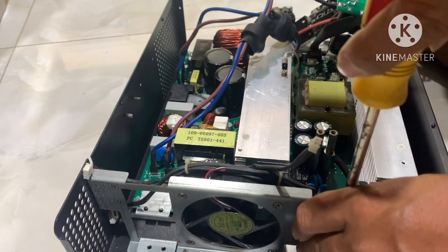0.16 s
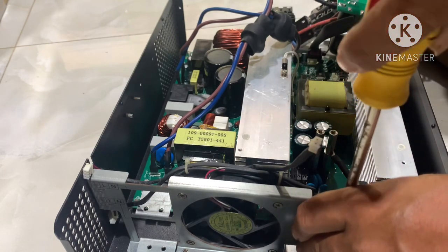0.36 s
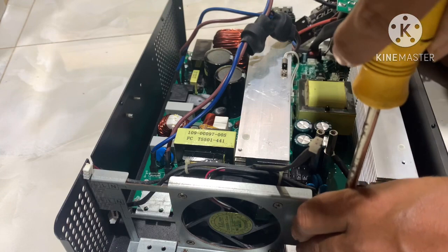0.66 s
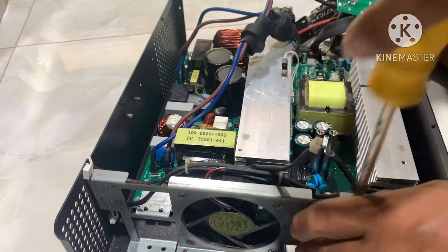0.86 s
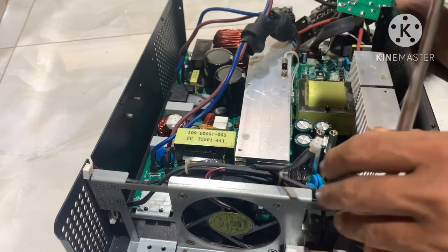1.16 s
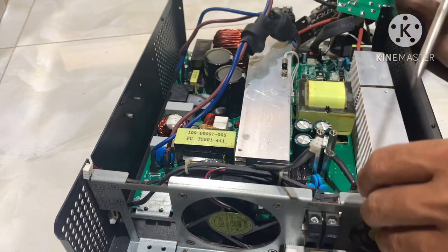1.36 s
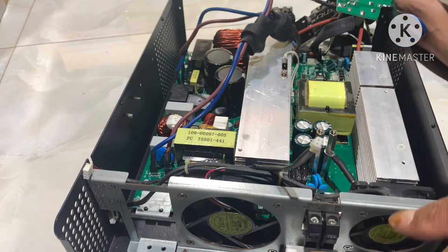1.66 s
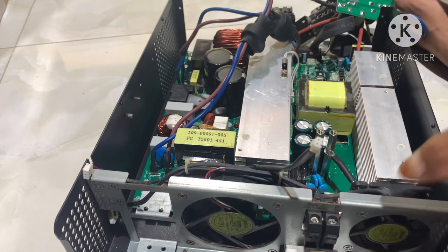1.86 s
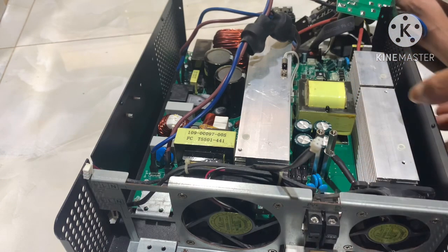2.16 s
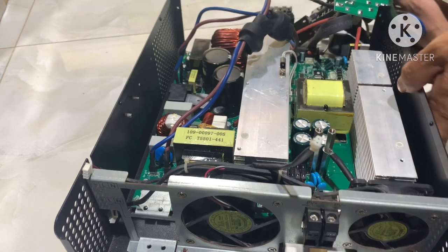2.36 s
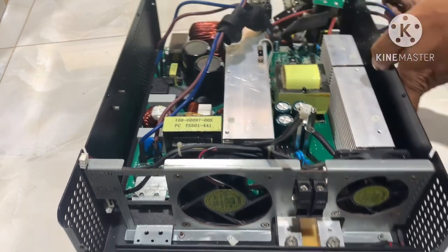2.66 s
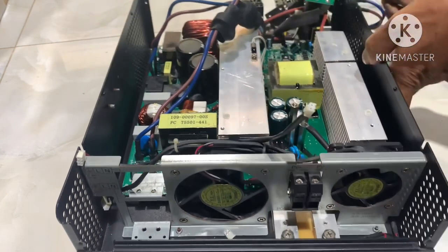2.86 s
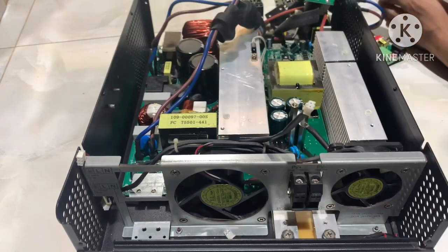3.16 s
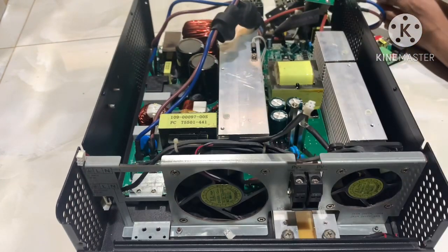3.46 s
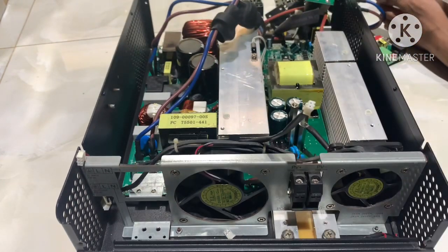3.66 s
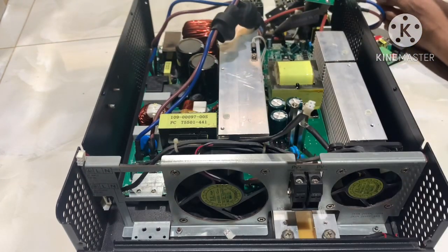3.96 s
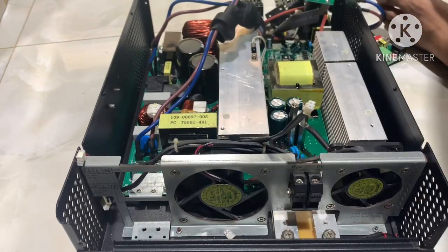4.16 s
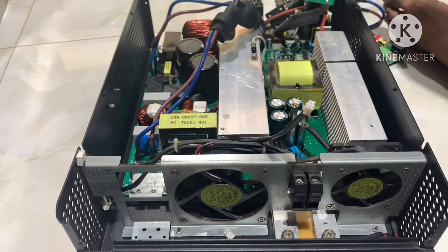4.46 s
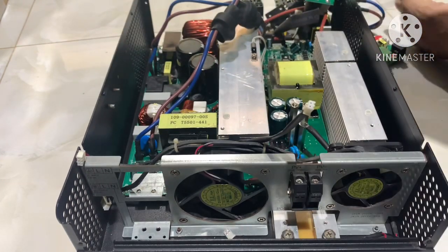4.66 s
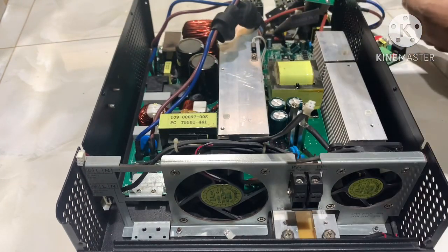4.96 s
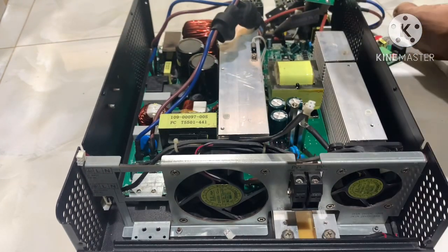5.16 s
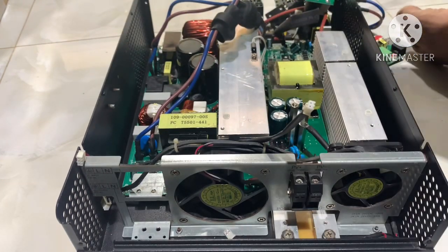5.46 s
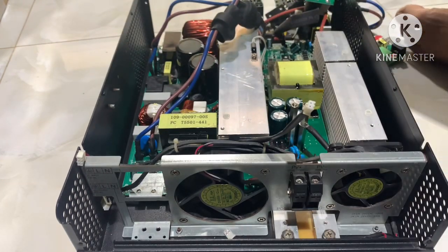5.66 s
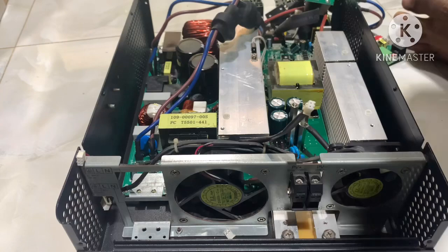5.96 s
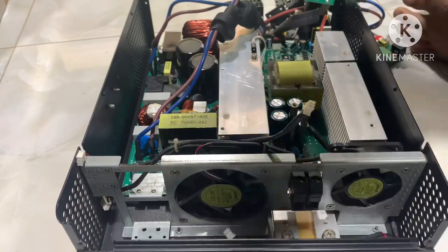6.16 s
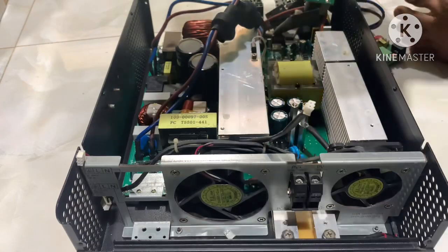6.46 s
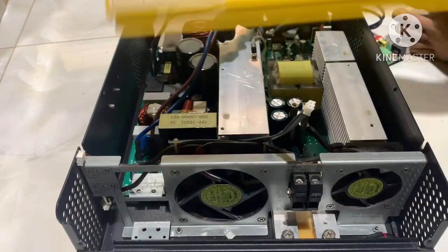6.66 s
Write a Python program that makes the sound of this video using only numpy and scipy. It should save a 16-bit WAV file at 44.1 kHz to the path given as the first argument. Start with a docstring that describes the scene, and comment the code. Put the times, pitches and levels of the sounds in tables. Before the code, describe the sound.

A low electrical hum and a chugging single-cylinder engine passing outside, with faint metal rubbing, screwdriver clinks and sharp knocks on a sheet-metal case.

```python
"""On a workshop floor an open inverter hums from the start, a 100 Hz tone; its late dips stand for beating.
A screwdriver shaft clinks softly, then hands rub and drag the sheet-metal case: filtered grainy noise.
Outside, a single-cylinder engine swells and thuds past, resonances struck by each firing, with whine and road hiss.
Wires and tools tick on the metal as it passes; knocks ring the case panels, thumps follow on the floor.
Late on the case is dragged again, and the loose cover rattles once more, all in front of a two-port microphone."""
import sys
import numpy as np
from scipy import signal
from scipy.fft import rfft, irfft, next_fast_len
from scipy.io import wavfile
from scipy.ndimage import uniform_filter1d

SR = 44100
rng = np.random.default_rng(int(sys.argv[2]) if len(sys.argv) > 2 else 0)


def master_out(mix):
    """Clip the mix to full scale and print it as 16-bit PCM to the path in sys.argv[1]."""
    frames = np.transpose(np.atleast_2d(mix))
    ceiling = np.clip(frames, -1, 1)
    pcm = np.round(ceiling * 32767).astype(np.int16)
    wavfile.write(sys.argv[1], SR, pcm)


N = 301057
TIME = np.arange(N) / SR

# Knocks on the sheet metal. Each row: start in seconds, clack level in dB before colouring, panel ring level in dB,
# share of the ring time left by the grip (0-1), pitch factor.
KNOCKS = [(3.846, -56, -58, 0.4, 0.98), (3.974, -51, -56, 0.1, 1), (3.98, -52.5, -36, 0.4, 0.96),
          (4.9815, -54, -58, .9, 1.03), (4.986, -44, -46, 0.9, 1.03), (4.996, -48, -42.5, 1, 0.99),
          (5.018, -46, -40.5, 0.96, 1.02), (5.0325, -44, -40, 0.84, 1.12), (5.048, -47.5, -49, 0.9, 1.03),
          (5.066, -53, -45.5, 0.8, 1.03), (5.095, -57, -48, 1, 1.02), (5.1425, -38.5, -38.5, 1, 1),
          (5.1468, -55, -38, 0.74, 1), (6.021, -72, -51.5, 0.37, 1.17), (6.4195, -50, -61, .5, 1),
          (6.427, -49, -61, 0.25, 1.04)]
# Modes of the case panels, ungripped. Each row: frequency in Hz, level in dB, t60 in seconds.
PANEL_MODES = [(174, -6, 0.14), (311, -11, 0.27), (380, -15.5, 0.32), (453.3, -1.5, 0.19), (492, 0, 0.13),
               (568, -15, 0.12), (660, -23, 0.2), (707, -21, 0.11), (783, -17.5, 0.14), (906, -17, 0.07),
               (972, -27, 0.17), (1312, -25, 0.16), (1490, -27, 0.17), (1518, -29, 0.13), (1630, -30, 0.11),
               (3470, -28, 0.21)]
# Spectrum of the clack. Each row: frequency in Hz, gain in dB.
CLACK_COLOUR = [(200, 5), (350, 12), (620, 2), (900, 8.5), (1150, -11), (1500, 6), (2300, -10.5),
                (2750, -10), (3350, 9), (4200, -9), (4700, 1.5), (5500, 0.5), (6500, 7.5), (7400, 5),
                (8400, -7), (9500, -10), (10800, -40), (15000, -45)]
# Small bright contacts. Each row: start in seconds, level in dB before colouring, sharpness (0-1).
TICKS = [(1.684, -54, 0.1), (3.8448, -31, 0.45), (3.8487, -31.5, 0.36), (3.864, -43, .1), (3.973, -37, .2),
         (3.9757, -36, 0.1), (3.981, -38, 0.1), (3.986, -39, .2), (4.012, -45, 0), (4.0278, -24, 0),
         (4.1353, -43.5, 0.3), (4.247, -41, 0.35), (4.343, -46.5, 0.3), (4.3775, -40, 0.3),
         (4.491, -39.5, .1), (4.9085, -50, 0.2), (4.9853, -34.5, 0), (4.994, -39, 0), (5.0213, -35, 0.14),
         (5.0363, -28.5, 0), (5.049, -39, 0), (5.065, -45, 0), (5.077, -41, 0), (5.1432, -26, 0.03),
         (6.4216, -43.5, 1), (6.4237, -36, 0.8), (6.428, -41, .3), (6.43, -40.5, .2)]
# Spectra of a tick and of its glassy top. Each row: frequency in Hz, gain in dB.
TICK_COLOUR = [(500, -39), (2600, -28), (3600, -11), (4600, -19.5), (6300, -3.5), (7500, -3), (8400, 2),
               (9400, -4.5), (10500, -32), (12500, -48), (15000, -59)]
SHARP_COLOUR = [(8000, -38), (9700, -5), (10500, -14), (11500, -4), (12600, -21), (14500, -25)]
# Thin high modes of screws and terminals. Each row: frequency in Hz, relative level in dB, t60 in seconds.
TERMINAL_MODES = [(3620, -7.5, 0.039), (5660, -18, 0.12), (6240, -14, 0.12), (6298, -10.5, 0.18),
                  (6570, -16, .14), (6860, -12.5, 0.08), (8200, -6.5, 0.07), (8330, -7.5, 0.039),
                  (8660, -13.5, 0.089), (9140, -10.5, 0.077), (9540, -14.5, 0.065)]
# The loose cover rattles. Each row: start in seconds, level in dB before the ring.
COVER_RATTLES = [(3.976, -55.5), (4.985, -57), (5.145, -51), (6.425, -51.5)]
# Modes of the cover. Each row: frequency in Hz, level in dB, t60 in seconds.
COVER_MODES = [(706, -4.5, 0.037), (952, -1, 0.063), (1026, 0, 0.066), (1230, 1, 0.074), (1325, 5, 0.049),
               (1424, 6.5, 0.045), (1640, -1.5, 0.063), (1995, -5.5, 0.074), (2380, -2.5, 0.035)]
# The screwdriver shaft clinks, one row: start in seconds, level in dB before the ring.
SHAFT_CLINK = (.882, -57.5)
# Modes of the shaft. Each row: frequency in Hz, level in dB, t60 in seconds.
SHAFT_MODES = [(1290, -1, 0.11), (1630, -14, .07), (2070, 2, 0.12)]
# Dull thumps of the case on the floor. Each row: start in seconds, level in dB before the decay, ring in Hz.
FLOOR_BUMPS = [(5.043, -31, 194.6), (5.052, -39, 265.7), (5.151, -41.5, 313), (5.161, -31, 98)]
# The case judders as it slides. Each row: peak in seconds, length in seconds, level in dB, ring in Hz,
# pitch wander in Hz.
JUDDERS = [(2.61, 0.018, -67, 1354, 37), (2.668, 0.055, -64, 854, 30), (2.672, 0.041, -68, 639, 30),
           (2.683, 0.023, -63, 460, 15), (2.981, 0.037, -63.5, 718, 8.7), (2.982, 0.045, -74.5, 1676, 13),
           (6.008, 0.1, -65, 556, 41), (6.016, 0.062, -63, 692, 37), (6.12, 0.053, -65, 730, 16.2)]
# Hands rubbing on metal and wires. Each row: peak in seconds, length in seconds, level in dB before colouring.
RUBS = [(1.78, 0.12, -71), (1.885, 0.11, -61), (1.98, 0.031, -68), (2.08, 0.1, -68), (2.38, 0.37, -70),
        (2.53, 0.075, -65), (2.68, 0.16, -56), (2.77, 0.14, -61), (2.99, 0.087, -67.5), (4.22, 0.45, -65),
        (4.5, 0.14, -62), (4.83, 0.7, -69), (5.94, 0.035, -69), (6.05, 0.18, -67), (6.29, 0.36, -69.5)]
# Case and cover dragging on the floor. Each row: peak in seconds, length in seconds, level in dB before colouring.
DRAGS = [(2.57, 0.069, -69.5), (2.69, 0.14, -64), (6.04, 0.16, -70.5), (6.14, 0.13, -73.5),
         (6.27, 0.14, -69.5)]
# Spectra of rubbing and dragging. Each row: frequency in Hz, gain in dB.
RUB_COLOUR = [(300, -35), (2000, -6.5), (4700, -30.5), (6200, -2), (7600, -9.5), (8300, 1), (9300, -5),
              (10500, -15.5), (12000, -22.5), (14000, -59)]
DRAG_COLOUR = [(200, -8), (450, 23), (560, 11), (720, 21.5), (860, 13.5), (1100, 12), (1450, 10),
               (2200, -3), (2800, -12), (3400, 1), (4500, -13), (9000, -48), (12000, -55)]

# Level of the 100 Hz tone, its late dips standing for beating between hum and engine.
# Each row: time in seconds, level in dB before the small random part.
TONE_LEVEL = [(0, -53), (.2, -48.5), (.28, -53), (.35, -46.5), (.42, -49), (.54, -43.5), (.72, -66.5),
              (1.1, -49.5), (1.62, -56), (1.82, -46.5), (2.8, -48.5), (4.2, -58.5), (6.05, -50.5),
              (6.17, -44), (6.36, -52), (6.43, -39.5), (6.49, -56.5), (6.57, -40.5), (6.64, -49.5),
              (6.7, -42)]
HUM_HZ = 100

# Engine speed. Each row: time in seconds, firings per second.
ENGINE_SPEED = [(0, 22.3), (1.3, 23.7), (2.85, 25.4), (3.3, 25.3), (3.52, 24.4), (3.7, 25.3), (3.9, 24.1),
                (4.13, 26), (4.3, 23.2), (4.4, 22.4), (4.54, 24), (4.75, 23), (5.1, 22.5), (5.7, 21.1),
                (6.83, 19.9)]
# Resonances struck by the firings: deep boom, exhaust bark, exhaust rasp and the hollow drone of the open pipe.
# Each row: frequency in Hz, relative level in dB, t60 in seconds.
BOOM_MODES = [(48.2, -0.5, 0.1), (68.85, 0, 0.22)]
BARK_MODES = [(117.5, 0, 0.096), (151.6, -3, 0.17)]
RASP_MODES = [(168, 3.5, 0.14), (196.7, 2, 0.065), (215.6, -4, 0.08), (293.3, -9, 0.12),
              (308, -21.5, 0.042)]
DRONE_MODES = [(280, -3, 0.058), (310.3, -4.5, 0.079)]
# Levels of boom and rasp, ahead of the wall filter. Each row: time in seconds, level in dB.
BOOM_LEVEL = [(0, -66), (1.1, -53.5), (2.15, -58.5), (2.4, -49), (2.65, -48.5), (3.35, -50), (3.52, -39.5),
              (3.7, -41.5), (3.87, -41), (4.1, -45), (4.4, -34.5), (5.3, -39.5), (5.5, -41.5), (6.25, -43),
              (6.6, -59), (6.83, -62)]
RASP_LEVEL = [(0, -65), (1.1, -60.5), (1.6, -53.5), (1.8, -55), (2.45, -48), (3.2, -50.5), (3.6, -47),
              (4.1, -58.5), (4.8, -58), (5.3, -46.5), (5.6, -53), (6.83, -56.5)]
# The thud, higher once the pipe faces the microphone.
# Each row: time in seconds, level in dB on top of the distance law, ring in Hz.
THUD_CURVE = [(0, -5, 92), (1.65, -11, 95.4), (2.7, 5, 101.5), (3.17, -1.5, 100.8), (3.3, 6.5, 101),
              (3.37, 1.5, 100), (3.48, 13, 95.8), (3.68, -1, 99), (3.79, 5, 99), (3.95, -5, 98),
              (4.2, -4, 99.4), (4.58, 4.5, 93.8), (4.85, -3.5, 107.6), (5.4, 2.5, 108.4),
              (5.54, 7.5, 105.6), (5.83, -1.5, 102.2), (5.94, 4.5, 103), (6.03, -3.5, 103.4),
              (6.19, 4.5, 101.7), (6.5, -4, 99.5)]
# Level of the bark. Each row: time in seconds, level in dB on top of the distance law.
BARK_LEVEL = [(0, -23), (1.4, -8.5), (2.6, -2.5), (3.7, -8.5), (4.08, -9.5), (4.24, 2), (4.9, 2.5),
              (5.3, -5), (5.7, -21), (6.83, -9.5)]
# Spectra of bark, rasp and the way out through the walls. Each row: frequency in Hz, gain in dB.
BARK_COLOUR = [(85, -11.0), (115, 6.0), (150, 5.5), (180, -6.0)]
RASP_COLOUR = [(120, -18.0), (170, -9.0)]
WALL_COLOUR = [(22, -42), (31, -23), (42, -2), (330, -4.5), (600, -22.0), (1500, -48)]
THUD_T60 = 0.21  # seconds
# The vehicle passes in a straight line; DISTANCE_M is its closest distance
PASS_S, DISTANCE_M, TRAVEL_M_PER_S = 4.313, 3.84, 8.1
# The pipe points backwards, so the exhaust peaks after the road hiss; the drone comes last
PIPE_LAG_S, DRONE_LAG_S = 0.18, 0.48
# Base levels at the closest point, before curves and colours
THUD_DB, BARK_DB, DRONE_DB, ROAD_DB = -34, -34, -48.5, -60.5
# How steeply each part fades with distance (1 = as 1 / distance)
THUD_FADE, BARK_FADE, DRONE_FADE, ROAD_FADE = 1.19, 0.75, 2.8, 1.75

# The whine. Each row: time in seconds, pitch in Hz before the waver, level in dB before the waver.
WHINE_CURVE = [(0, 337.7, -61.5), (.3, 355, -72.5), (.85, 359, -71), (1.35, 376, -71), (1.9, 367, -68.5),
               (2.7, 372.8, -71), (3.1, 384, -69), (3.7, 394.6, -64), (4.8, 396.5, -61.5), (5.5, 398, -64),
               (5.8, 380, -76), (6.25, 342, -90), (6.42, 339, -68.5), (6.83, 335, -75.5)]
# Spectra of the room tone and the road hiss. Each row: frequency in Hz, level in dB.
ROOM_TONE = [(22, -67.5), (45, -29.5), (100, -26.5), (160, -37.5), (220, -45.5), (400, -51.5), (620, -59.5),
             (780, -61), (1100, -72.5), (1650, -64), (2300, -81.5), (3300, -74.5), (5200, -84),
             (6900, -63.5), (7600, -82), (8300, -76.5), (11000, -99)]
ROAD_COLOUR = [(100, 35), (300, 29.5), (385, 22.5), (455, 29), (620, 16.5), (1050, 13.5), (1500, 16),
               (1800, 8), (2100, 1), (2700, -7), (3550, 3), (4500, -23), (6200, 1.5), (9000, -4),
               (12000, -30), (14000, -59)]

# The right microphone port is much brighter in the top octave. Each row: frequency in Hz, gain in dB.
RIGHT_PORT = [(7850, 0), (8050, 18), (9000, 18.5), (10200, 19.5), (11000, 17), (12200, 10), (13000, 2),
              (14000, 0)]
# Travel time between the two ports, and the share of the sound that runs along that line
PORT_DELAY_S, AXIAL_SHARE = 0.000491, 0.58
EDGE_HZ = 14450  # upper band limit


def knocks(spot_db=0.5, shimmer_db=-35, shimmer_t60=0.3):
    """Knocks clack and ring the panels; each spot favours other modes, a gripping hand damps and bends them."""
    s, clack_db = np.transpose(KNOCKS)[:2]
    taps = blows(s, clack_db)
    crack = burst(taps, t60=0.058, tail_db=-12.0, tail_t60=0.27, rise_s=0.001) * amp(1.2 * drift(300))
    clack = colour(crack + shimmer(taps, shimmer_db, shimmer_t60), CLACK_COLOUR)
    hz, db, t60 = np.transpose(PANEL_MODES)
    panels = np.zeros(N)
    for at, _, ring_db, free, bend in KNOCKS:
        spot = spot_db * rng.standard_normal(len(PANEL_MODES))
        panels += ring(blows(at, ring_db), zip(hz * bend, db + spot, t60 * max(free, .05)))
    return clack + room(panels, wet_db=-4.5, t60=0.38)


def shimmer(x, db, t60, count=90):
    """The sheet's many close upper modes, the same for every blow, as heard at each port."""
    edges = np.linspace(1200, 10000, count)
    hz = edges + (edges[1] - edges[0]) * rng.random((2, count))
    return np.array([ring(x, [(f, db, t60) for f in port]) for port in hz])


def ticks():
    """Hard contacts crack briefly and ring small metal parts; the sharpest add a glassy top."""
    s, db, sharpness = np.transpose(TICKS)
    taps = blows(s, db)
    crack = burst(taps, t60=0.014, tail_db=-22, tail_t60=0.11) * amp(0.77 * drift(400))
    sharp_taps = blows(s, db + 20 * np.log10(sharpness))  # sharpness 0 gives silence
    top = burst(sharp_taps, t60=0.016, tail_db=-17.5, tail_t60=0.15)
    terminals = amp(-31.0) * room(ring(taps, TERMINAL_MODES), wet_db=2.0, t60=0.35)
    return colour(crack, TICK_COLOUR) + colour(top, SHARP_COLOUR) + terminals


def rattle(s, db, modes, t60):
    """A rough contact chatters for a moment and rings the modes."""
    chatter = burst(blows(s, db), t60, tail_db=-13.0, tail_t60=0.22, rise_s=0.002)
    # a longer chatter is scaled down
    return np.array([ring(port, modes) for port in chatter]) / np.sqrt(t60 * SR / np.log(1e6))


def bumps(t60=0.14, rise_s=0.0028):
    """The case settles on the floor with dull, low thumps: softly rising, damped tones."""
    t = np.arange(SR // 4) / SR
    shape = (1 - np.exp(-t / rise_s)) * amp(-60 * t / t60)
    out = np.zeros(N)
    for s, db, hz in FLOOR_BUMPS:
        out += signal.oaconvolve(blows(s, db), shape * np.sin(2 * np.pi * hz * t))[:N]
    return out


def judders():
    """The sliding case sticks and slips, making one patch of sheet sing with a wandering pitch."""
    out = np.zeros(N)
    for s, length, db, hz, wander_hz in JUDDERS:
        phase = 2 * np.pi * np.cumsum(hz + wander_hz * drift(150)) / SR
        tone = np.sqrt(2) * np.sin(phase) * amp(2.6 * drift(110))
        out += tone * strokes([(s, length, db)], rise_share=0.39)
    return room(out, wet_db=-3.5, t60=0.3)


def handling():
    """Grainy friction: skin on metal hisses, the case on the floor scrapes lower."""
    rub = colour(noise() * amp(1.45 * drift(350)), RUB_COLOUR) * strokes(RUBS, rise_share=0.62)
    drag = colour(noise() * amp(2 * drift(120)), DRAG_COLOUR) * strokes(DRAGS, rise_share=0.62)
    return rub + drag


def hum():
    """Iron cores buzz at twice the mains frequency; late dips in level stand for beating with the engine."""
    random_db, random_rad = 1.7 * drift(14), .25 * drift(6)
    tone = np.sqrt(2) * np.sin(2 * np.pi * HUM_HZ * TIME + random_rad)
    return tone * amp(curves(TONE_LEVEL)[0] + random_db)


def engine(firing_s=4.53, uneven_db=1.5, jitter=0.0077, boom_lag_s=0.013):
    """One uneven exhaust pulse per firing rings the pipe and the walls; the deepest boom arrives late."""
    turns = np.cumsum(curves(ENGINE_SPEED)[0]) / SR
    # count from firing_s; jitter is in firings
    turns = turns - np.interp(firing_s, TIME, turns) + jitter * drift(20)
    firings = np.diff(np.floor(turns), prepend=np.floor(turns[0])) > 0
    pulses = firings * amp(uneven_db * drift(25))
    puffs = unit(burst(pulses, t60=0.13, tail_db=-25, tail_t60=0.3)[0])  # gas rushes out after each pulse

    near_db = passing_db(PIPE_LAG_S)
    late_pulses = np.roll(pulses, round(boom_lag_s * SR))
    boom = amp(curves(BOOM_LEVEL)[0]) * unit(ring(late_pulses, BOOM_MODES))
    thud_db, thud_hz = curves(THUD_CURVE)
    thud_gain = amp(THUD_DB + THUD_FADE * near_db + thud_db)
    thud = thud_gain * unit(glide_ring(pulses, thud_hz, THUD_T60))
    bark_gain = amp(BARK_DB + BARK_FADE * near_db + curves(BARK_LEVEL)[0])
    bark = bark_gain * unit(colour(ring(pulses, BARK_MODES), BARK_COLOUR))
    rough = unit(ring(pulses, RASP_MODES)) + 0.6 * unit(ring(puffs, RASP_MODES))
    rasp = amp(curves(RASP_LEVEL)[0]) * unit(colour(rough, RASP_COLOUR))
    drone_gain = amp(DRONE_DB + DRONE_FADE * passing_db(DRONE_LAG_S))
    drone = drone_gain * unit(ring(puffs, DRONE_MODES))
    return colour(boom + thud + bark + rasp + drone, WALL_COLOUR)  # the walls keep the treble out


def glide_ring(x, hz, t60):
    """Rings one mode whose pitch follows a curve: a decay filter in a frame that turns with the pitch."""
    turn = np.exp(2j * np.pi * np.cumsum(hz) / SR)
    decay = np.exp(-np.log(1000) / (t60 * SR))
    return (turn * signal.lfilter([1], [1, -decay], x / turn)).imag


def passing_db(lag_s):
    """Level of the passing vehicle against its closest point, falling as 1 / distance."""
    along_m = TRAVEL_M_PER_S * (TIME - PASS_S - lag_s)
    return 20 * np.log10(DISTANCE_M / np.hypot(DISTANCE_M, along_m))


def whine(lower_db=-59, lower_fade=1.5):
    """A thin rotating whine climbs, then sinks; close by, a lower order of the same shaft joins it."""
    hz, db = curves(WHINE_CURVE)
    waver, waver_db = .002 * drift(14), 1.4 * drift(10)
    phase = 2 * np.pi * np.cumsum(hz * (1 + waver)) / SR
    lower_gain = amp(lower_db + lower_fade * passing_db(DRONE_LAG_S) + 2.0 * drift(10))
    lower_order = np.sin(phase * 2 / 3)
    return np.sqrt(2) * (amp(db + waver_db) * np.sin(phase) + lower_gain * lower_order)


def air():
    """Steady room tone and the grainy, fluttering swell of road hiss, both shaped noise."""
    road_db = ROAD_DB + ROAD_FADE * passing_db(0) + 1.42 * drift(40)
    still = patchy(colour(noise(), ROOM_TONE), depth_db=3.02, patch_hz=120, patch_s=0.14)
    road = patchy(colour(noise(), ROAD_COLOUR), depth_db=3.0, patch_hz=170, patch_s=.05)
    return still + road * amp(road_db)


def patchy(x, depth_db, patch_hz, patch_s):
    """Uneven grain: small patches of the spectrum swell and fade on their own."""
    z = signal.stft(x, nperseg=1024, noverlap=768)[2]
    field = rng.standard_normal(z.shape[1:])
    spans = patch_hz * 1024 / SR, patch_s * SR / 256  # in bins and in frames
    for axis, span in enumerate(spans):
        field = uniform_filter1d(field, max(round(span), 1), axis)
    return signal.istft(z * amp(depth_db * unit(field)), nperseg=1024, noverlap=768)[1][:, :N]


def amp(db):
    """Decibels to gain."""
    return 10 ** (np.asarray(db) / 20)


def unit(x):
    """Scales to rms 1."""
    return x / np.sqrt(np.mean(x ** 2) + 1e-20)


def curves(rows):
    """The columns of a table after the time, at every sample."""
    s, *columns = np.transpose(rows)
    return [np.interp(TIME, s, c) for c in columns]


def strokes(rows, rise_share):
    """Gain of separate movements: each swells to its peak over a share of its length, then dies away."""
    gain = np.zeros(N)
    for s, length, db in rows:
        width = length * np.where(TIME < s, rise_share, 1 - rise_share)
        gain += amp(db) * np.exp(-((TIME - s) / width) ** 2)
    return gain


def drift(rate):
    """Slow chance of rms 1, with about this many turns a second."""
    knots = rng.standard_normal(4096)
    return unit(np.interp(TIME * rate, np.arange(len(knots)), knots))


def noise():
    """Unrelated white noise at the two ports."""
    return rng.standard_normal((2, N))


def blows(s, db):
    """One impulse for each contact."""
    out = np.zeros(N)
    np.add.at(out, np.round(np.atleast_1d(s) * SR).astype(int), amp(db))
    return out


def ring(x, modes):
    """Rings damped modes (Hz, dB, t60); neighbours swing in opposite directions."""
    t = np.arange(SR // 2) / SR
    shape = np.zeros(len(t))
    for k, (hz, db, t60) in enumerate(modes):
        shape += (-1) ** k * amp(db - 60 * t / t60) * np.sin(2 * np.pi * hz * t)
    return signal.oaconvolve(x, shape)[:N]


def burst(x, t60, tail_db, tail_t60, rise_s=0.00063):
    """Each blow starts a dense crack and a softer tail of scattered sound."""
    t = np.arange(SR // 2) / SR
    decay = amp(-60 * t / t60) ** 2 + amp(tail_db - 60 * t / tail_t60) ** 2
    power = decay * (1 - np.exp(-t / rise_s)) ** 2
    return noise() * np.sqrt(abs(signal.oaconvolve(x ** 2, power)[:N]))


def colour(x, points):
    """Filters by a spectrum of (Hz, dB) points, joined along log frequency."""
    hz, db = np.transpose(points)
    size = next_fast_len(N + 4096)
    f = np.fft.rfftfreq(size, 1 / SR)
    gain = amp(np.interp(np.log(f + 1), np.log(hz), db))
    return irfft(rfft(x, size) * gain, size)[..., :N]


def room(x, wet_db, t60):
    """Direct sound plus a diffuse tail at each port."""
    t = np.arange(SR // 2) / SR
    tail = rng.standard_normal((2, len(t))) * amp(-60 * t / t60) * (t > .004)
    tail /= np.linalg.norm(tail[0])
    return x + amp(wet_db) * signal.oaconvolve(x[None], tail, axes=1)[:, :N]


def ports(x, mono_hz):
    """Long waves reach both ports alike; short ones alternate in and out of phase with frequency."""
    size = next_fast_len(N)
    f = np.fft.rfftfreq(size, 1 / SR)
    long_waves = 1 / (1 + (f / mono_hz) ** 14)
    # likeness of the ports: short waves arrive from either side
    same = long_waves + (1 - long_waves) * AXIAL_SHARE * np.cos(2 * np.pi * f * PORT_DELAY_S)
    mid, side = rfft([x[0] + x[1], x[0] - x[1]], size) / 2
    mid, side = mid * np.sqrt(1 + same), side * np.sqrt(1 - same)
    return irfft([mid + side, mid - side], size)[:, :N]


def scene():
    """Everything at the two microphone ports; thumps, hum, engine and whine reach both alike."""
    cover = rattle(*np.transpose(COVER_RATTLES), COVER_MODES, t60=0.049)
    clink = rattle(*SHAFT_CLINK, SHAFT_MODES, t60=0.02)
    wide = knocks() + ticks() + cover + clink + judders() + handling() + air()
    return ports(wide, mono_hz=950) + bumps() + hum() + engine() + whine()


def record(dry):
    """A brighter right port, faint amplifier hiss and the band limit."""
    heard = np.array([dry[0], colour(dry[1], RIGHT_PORT)]) + amp(-88.0) * noise()
    lowpass = signal.firwin(511, EDGE_HZ, window=("kaiser", 9), fs=SR)
    return signal.oaconvolve(heard, lowpass[None], "same")


dry = scene()
out = record(dry)
master_out(out)
```